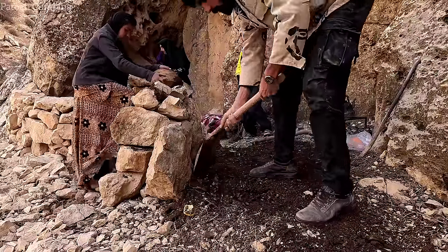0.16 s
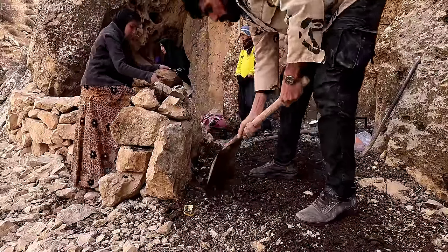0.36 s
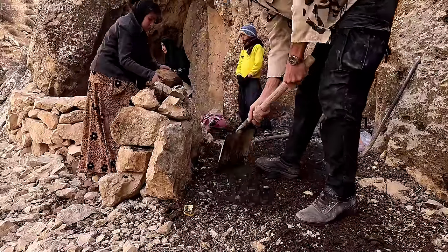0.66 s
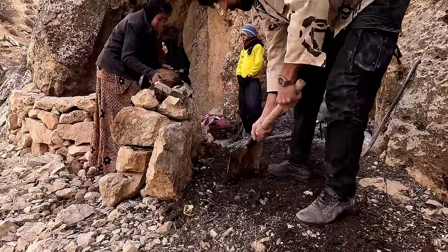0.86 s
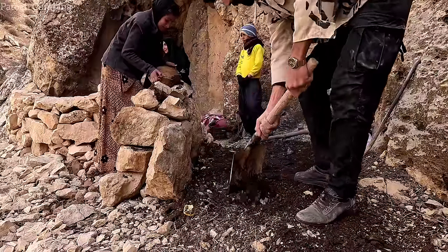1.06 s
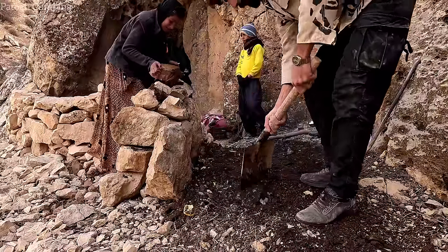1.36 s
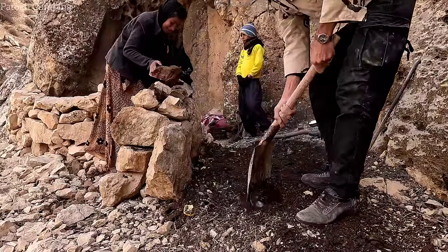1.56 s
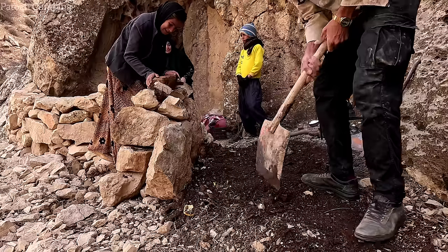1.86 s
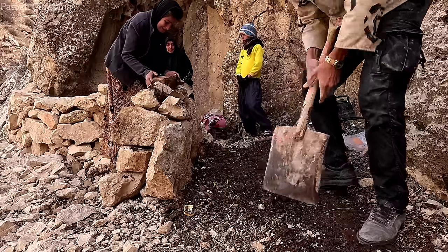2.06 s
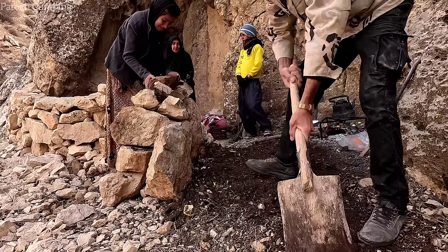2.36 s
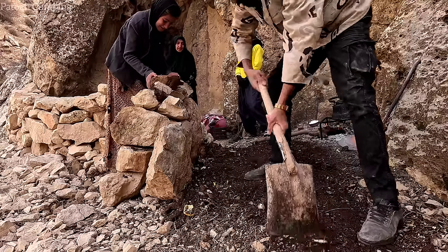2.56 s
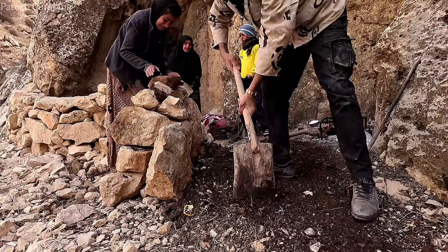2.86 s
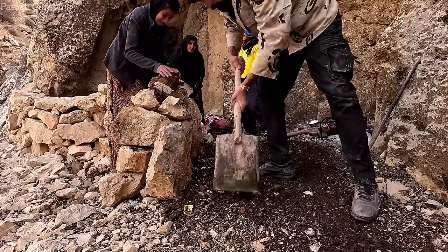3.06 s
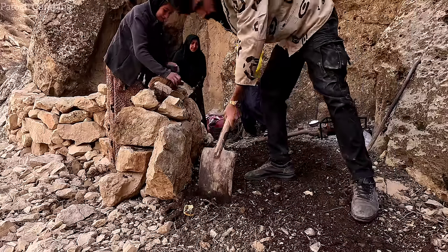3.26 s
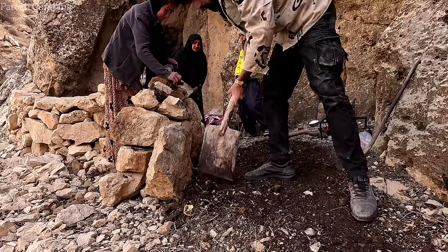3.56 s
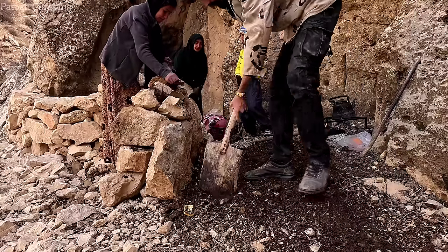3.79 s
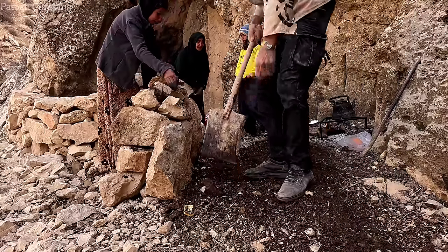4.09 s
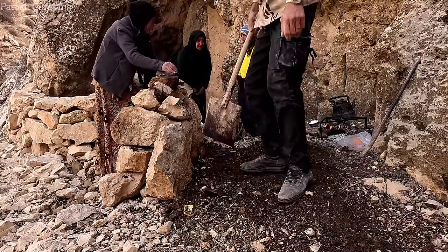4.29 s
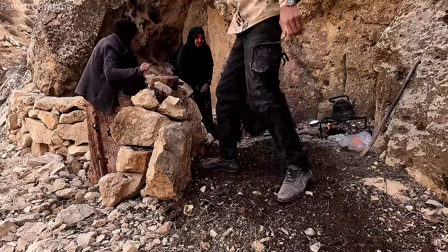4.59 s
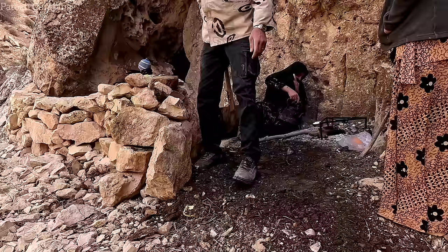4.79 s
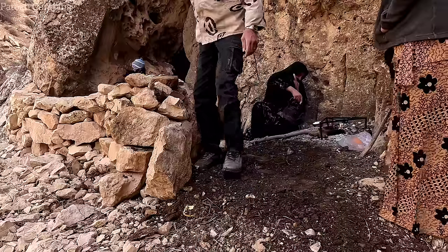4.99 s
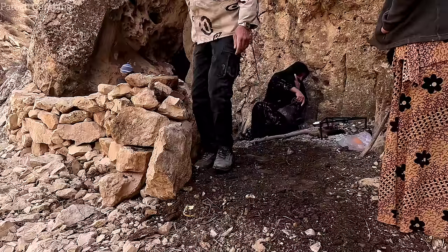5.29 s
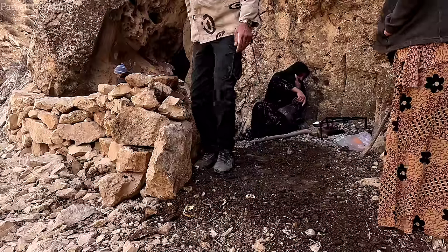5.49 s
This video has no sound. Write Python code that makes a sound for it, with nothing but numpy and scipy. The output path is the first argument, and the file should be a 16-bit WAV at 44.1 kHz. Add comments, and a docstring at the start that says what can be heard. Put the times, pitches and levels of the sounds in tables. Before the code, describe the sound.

Shovel blows, grinding grit and knocking stones sound a few steps from a phone's stereo microphone, over quiet air hiss and soft low wind buffets. Three busy crunching clusters are followed by sparser single hits, with a small sharp tick to the left near three seconds. The blade rings briefly, muffled by dirt, and rock gives a short rough echo. Finally the digging stops, leaving faint scrapes and foot-like knocks.

```python
"""Quiet outdoor hiss (shaped noise) and wind puffs (low noise) run throughout, a few steps from the digging.
From the start dirt slides on a steel shovel and under feet, and blows chop stony dirt: bursts of noise grains.
Stones knock (short tones) and the blade rings (fading modes); a rock overhang adds scattered noise echoes.
A sharp tick sounds on the left at 3.08 s. From about 4 s the blows thin out, and near 4.77 s comes
a blink of silence before the last soft scrapes and knocks."""
import sys
import numpy as np
from scipy import signal
from scipy.fft import rfft, irfft
from scipy.io import wavfile
from scipy.ndimage import uniform_filter1d

SR = 44100
rng = np.random.default_rng(int(sys.argv[2]) if len(sys.argv) > 2 else 0)


def waveform_to_disk(signal):
    """Save audio, clipped to [-1, 1], as 16-bit WAV at the path in sys.argv[1]."""
    frames = np.transpose(np.atleast_2d(signal))
    scaled = np.clip(frames, -1, 1) * 32767
    samples = np.round(scaled).astype(np.int16)
    wavfile.write(sys.argv[1], SR, samples)


N = 248724
T = np.arange(N) / SR  # time of every sample, s

# The outdoor hiss. Each row: frequency in Hz, relative level in dB (per Hz).
AIR_SPECTRUM = [(59, -25.5), (100, -25.5), (185, 8), (295, -1), (558, -5), (860, -23), (1030, -1),
                (1310, -1.5), (3050, -12), (6990, -9.5), (9210, -18.5), (10200, -26.5), (16000, -57)]
AIR_DB = -63

# Low wind puffs on the microphone. Each row: peak time in seconds, level in dB.
WIND_PUFFS = [(.07, -57), (.42, -54), (0.914, -40.5), (1.09, -43.5), (1.45, -52), (1.84, -40.5),
              (1.97, -44.5), (2.581, -45), (2.72, -42), (2.82, -43.5), (3.09, -51), (3.29, -51),
              (3.75, -51.5), (4.48, -57.5), (4.8, -55.5), (4.98, -56), (5.199, -50), (5.471, -57)]
PUFF_RISE_DB_S, PUFF_FALL_DB_S = 397.5, 135.5  # dB per second before and after the peak
BREEZE_DB = -70.5  # level between puffs

# Dirt sliding on the blade and under feet. Each row: fullest moment in seconds, swell in seconds,
# fade in seconds, level in dB, brightness in dB per band step, thud against the level in dB.
DIRT_SLIDES = [(.08, 0.56, 0.19, -56, 5.5, 2.5), (.35, .08, 0.11, -50.5, -5, 3.5),
               (.45, 0.12, 0.18, -42, 3.5, -5), (.7, 0.077, 0.12, -55.5, -1, -4),
               (1.07, 0.12, 0.14, -47, -8, -2), (1.3, 0.2, 0.063, -69, -13, 17.5),
               (1.66, 0.17, 0.45, -61, 7, -7.5), (1.85, 0.12, 0.45, -61, -10.5, 10.5),
               (2.2, 0.68, 0.48, -55.5, 1, -10), (2.7, 0.18, 0.18, -30.5, -2.5, -6),
               (2.95, 0.087, 0.1, -58, 8, -7.5), (3.361, .06, 0.2, -48.5, -2, -13),
               (3.9, 0.18, 0.09, -45, 2.5, -4), (4.15, 0.14, 0.12, -66, 12.5, -7),
               (4.4, 0.28, 0.17, -56, -0.5, -3.5), (4.605, 0.15, 0.093, -45.5, -4, 2),
               (4.89, 0.22, 0.1, -56.5, -1, 9.5), (5.3, 0.3, 0.31, -59.5, 4, 6.5)]
SLIDE_EDGE_DB = -18  # level at the ends of swell and fade, against the fullest moment

# The four bands of grit: body, thud, clink, grit. Each row: lowest and highest frequency in Hz.
GRIT_BANDS = [(920, 2000), (120, 720), (2000, 4500), (4500, 15000)]
# How long a crunch lasts in each of those bands, as a factor on the blow's own crunch time.
BAND_LENGTHS = [0.78, 1.09, 0.73, 0.6]
FLANK_DB = -5.5  # body and grit lie this far under the clink band, before brightness tips them
PEBBLES_PER_S, PEBBLE_DB, PEBBLE_T60_S = 50, -4, .014  # rate at each pitch, level against the grit, ring time

# Blows of blade, stones and feet. Each row: start in seconds, clink level in dB, brightness in dB per
# band step, thud against the clink in dB, pitch of the loudest stone in Hz, rise in seconds,
# basic crunch time (to -60 dB) in seconds.
BLOW_LIST = [(0.131, -48.5, -1.5, -0.5, 1650, 0.0013, 0.35), (0.219, -18.5, -0.5, -9, 1810, 0.0043, 0.15),
             (0.235, -34.5, 6.5, -7.5, 2960, 0.00056, 0.25), (0.317, -33.5, 11, -24, 3880, 0.0027, 0.072),
             (0.325, -21.5, 5.5, -17, 6930, 0.0035, 0.085), (0.394, -17, 8.5, -11.5, 2786, 0.00087, 0.059),
             (0.408, -27, -1, -5, 2620, 0.00063, 0.13), (0.419, -19, 4.5, -18, 1790, 0.002, 0.13),
             (0.436, -27.5, -8, -4, 1090, 0.002, 0.058), (0.467, -34.5, 4.5, -10.5, 2800, 0.0011, 0.27),
             (0.506, -37.5, 4, -4.5, 2850, 0.0057, 0.16), (0.559, -25, 0.5, -17, 2250, 0.0043, 0.066),
             (0.639, -45, 14.5, -30, 3150, 0.0014, 0.074), (0.677, -47.5, 15, 1, 7310, 0.00099, 0.079),
             (0.901, -13.5, 9.5, -22.5, 6100, 0.0017, 0.048), (0.956, -22, 4.5, -14.5, 5040, 0.0034, 0.11),
             (0.97, -14.5, 2.5, -21, 2380, 0.0038, 0.066), (1.002, -27.5, 9.5, -7.5, 6650, 0.0047, 0.085),
             (1.034, -26, 9, -3.5, 3400, 0.0046, 0.09), (1.092, -40, 8.5, -15, 1950, 0.0005, 0.13),
             (1.119, -37.5, 11.5, 0, 6900, 0.0036, 0.086), (1.155, -40, -4, -0.5, 1060, 0.00079, 0.12),
             (1.178, -42, -10, -9, 1624, 0.0014, 0.062), (1.426, -22.5, 4, -26, 1850, 0.0013, 0.052),
             (1.436, -17.5, 4.5, -8, 3800, 0.00089, 0.065),
             (1.473, -12.5, 2.5, -26.5, 5430, 0.00015, 0.027),
             (1.484, -16.5, 1.5, -21, 3140, 0.00054, 0.066), (1.51, -16.5, 3, -13, 2130, 0.0014, 0.079),
             (1.556, -24.5, 4.5, -13, 3780, 0.0023, 0.1), (1.601, -31, 8.5, -34, 3580, 0.00077, 0.086),
             (1.614, -29, 0.5, -37, 2730, 0.00078, 0.053), (1.761, -46, -20.5, 15.5, 1900, 0.0027, 0.11),
             (1.796, -41.5, 10.5, 13, 890, 0.0015, 0.082), (1.814, -52.5, -15, 12, 900, 0.0044, .2),
             (1.916, -50, 2, 13.5, 1580, 0.0011, 0.063), (2.383, -25, 6.5, -18, 2940, 0.0029, 0.12),
             (2.425, -32.5, 0, -12.5, 1900, 0.0025, 0.13), (2.457, -35.5, 3, -13, 1774, 0.0022, 0.046),
             (2.518, -32.5, 6, -23.5, 4740, 0.0047, 0.15), (2.536, -33.5, 1.5, 0, 4260, 0.0012, 0.66),
             (2.565, -33, -3, -4, 2800, 0.00077, 0.1), (2.584, -20.5, 4, -22, 1770, 0.0075, 0.074),
             (2.593, -17.5, -1.5, -24, 1473, 0.005, 0.092), (2.618, -23, 1, -13, 2710, 0.0026, 0.09),
             (2.648, -18, 4.5, -13, 1470, 0.0025, 0.13), (2.674, -18, 3.5, -4, 3180, 0.0012, 0.064),
             (2.691, -17, 0, -18, 2250, 0.0055, 0.064), (2.712, -26.5, 6, -8, 2460, 0.0005, 0.13),
             (2.722, -29.5, 10.5, -1, 7100, 0.0022, 0.09), (2.74, -24.5, -0.5, -6, 2220, 0.001, 0.19),
             (2.772, -29, 4.5, -7, 2160, 0.0075, 0.27), (2.8, -20, -4.5, -12.5, 1360, 0.0027, 0.074),
             (2.82, -26.5, 5.5, -19, 1376, 0.0043, 0.084), (2.883, -40, 12, 0.5, 1360, 0.0044, 0.034),
             (2.984, -47.5, 8.5, -15.5, 6450, 0.00098, 0.067),
             (3.264, -23.5, 3.5, -11.5, 3520, 0.0023, 0.11), (3.278, -19.5, 12.5, -14, 6500, 0.001, 0.11),
             (3.293, -20.5, -6.5, -0.5, 3180, 0.00038, 0.032), (3.331, -36.5, 6.5, -8.5, 1830, 0.0017, 0.3),
             (3.384, -39.5, 13.5, -7, 7240, 0.003, 0.038), (3.423, -47, 5, -6.5, 1127, 0.0014, 0.13),
             (3.466, -39, 4.5, -17.5, 1815, 0.003, 0.065), (3.725, -37, 4, -8, 2800, 0.001, 0.31),
             (3.742, -17, 1, -8, 2340, 0.0015, 0.059), (3.796, -33.5, -13, -6, 1280, 0.0042, 0.11),
             (3.845, -40, 10, -10, 1740, 0.0031, 0.22), (3.892, -28, -6, -7.5, 1290, 0.0011, 0.073),
             (3.967, -42.5, -7.5, -8.5, 1720, 0.00086, 0.15), (4.37, -38.5, 4, -17, 2440, 0.00081, 0.02),
             (4.544, -41, 12.5, -5, 3450, 0.00063, 0.072), (4.585, -42.5, -7, -0.5, 1010, 0.002, 0.14),
             (4.615, -28.5, 10, -6.5, 6030, 0.00073, 0.037), (4.784, -53, -6, 8, 966, 0.0011, 0.081),
             (4.921, -53, -12.5, 6, 1380, 0.0023, 0.13), (5.149, -42.5, -4.5, 2, 1300, 0.0032, 0.16),
             (5.274, -32, -16, 1.5, 1870, 0.00069, 0.077), (5.283, -36.5, 3.5, -16, 1290, 0.0013, 0.071),
             (5.433, -55, -17, 11.5, 990, 0.0019, 0.14), (5.448, -47, 11, -6, 2660, 0.0016, 0.063)]
BLOW_LUMPS_DB = 2.0  # unevenness of the grains
CRACK_DB, CRACK_T60_S = -4.5, 0.0043  # extra first contact: level against the crunch, fade time
CRUNCH_BEND = 1.116  # above 1 the crunch holds a moment, then stops short
STONE_DB = 4.5  # the loudest stone in a blow, against the clink
STONE_WIDTH, STONE_T60 = 0.041, 0.41  # its width as a share of pitch, its extra fade against the crunch time

# Ringing tones of the free steel blade. Each row: frequency in Hz, relative level in dB,
# ring time in seconds before dirt shortens it.
BLADE_MODES = [(641, -10, .2), (845, -12, .35), (1023, -8, .2), (1260, -3, .14), (1365, -3, .28),
               (1464, -1, .5), (1566, -8, .24), (1755, -9, .36), (1846, -6, .24), (2013, -7, .16),
               (2264, -1, .24), (2417, -8, .2), (2635, -8, .2), (2920, -10, .17), (3063, -7, .12),
               (3130, -10, .2), (3451, -12, .23), (3760, -13, .26), (4258, -15, .17), (4414, -7, .27),
               (4720, -12, .16), (5560, -14, .15), (6449, -17, .2), (7181, -13, .14)]
BURIED_T60, BURIED_DB = 0.08, -46.5  # dirt on the blade: share of ring time left, level
WANDER_DB = 9.5  # drift of each ringing tone
LAID_DOWN_S = 4.2  # after this the blade is out of the dirt and the grit no longer rings it

# Single stones, from pebble ticks to dull thuds. Each row: start in seconds, level in dB,
# pitch in Hz, fade time in seconds.
STONE_KNOCKS = [(0.158, -12.5, 1630, 0.0037), (.343, -18.5, 393, 0.023), (.38, -20, 397, 0.022),
                (.624, -31, 7360, 0.0051), (0.646, -28, 4830, 0.0065), (0.2284, -6.5, 2710, 0.028),
                (.232, -10.5, 1140, 0.02), (.235, -20, 175, 0.085), (.682, -30, 170, 0.075),
                (.9012, 1, 5700, 0.0039), (.91, -27, 115, .12), (0.725, -25, 7800, 0.0017),
                (.734, -15, 3430, 0.0021), (1.038, -13, 404, 0.022), (1.211, -15, 7700, 0.0011),
                (1.241, -14.5, 4320, 0.0022), (1.284, -27, 880, 0.011), (1.7608, 2.5, 1390, 0.0091),
                (1.8065, 0, 1340, 0.0095), (1.8105, -1, 1024, 0.0081), (1.992, -28, 1165, 0.014),
                (2.597, -5, 2990, 0.017), (2.621, -9.5, 2690, .015), (2.65, -8, 3200, .015),
                (2.6765, -6.5, 3120, .018), (2.677, -10.5, 2180, .02), (2.682, -12, 1695, 0.038),
                (2.694, -6.5, 3300, .008), (2.7, -14.5, 1200, .04), (2.741, -14, 2250, 0.038),
                (3.121, -26, 6100, 0.0027), (3.222, -28, 6950, 0.0023), (3.288, -2, 409, 0.052),
                (3.289, -7.5, 1137, 0.03), (3.37, -25, 1230, 0.028), (3.285, -12.5, 137, 0.066),
                (3.744, -16.5, 178, 0.04), (3.745, -8.5, 606, 0.012), (3.802, -17, 663, 0.04),
                (3.882, -18, 498, 0.055), (3.891, -8.5, 1030, 0.026), (4.043, 5, 2530, 0.00091),
                (4.093, -34, 1340, 0.0089), (4.513, -18.5, 5940, 0.002), (4.531, -18.5, 1190, 0.0077),
                (4.595, -28, 476, .03), (4.61, -20.5, 940, 0.018), (4.650, -21, 6030, 0.0022),
                (5.128, -28.5, 1430, 0.0066), (5.211, -27, 4600, 0.0023), (5.276, -20.5, 436, 0.036),
                (5.282, -21, 1080, 0.033), (5.305, -27, 2000, .02), (5.583, -31.5, 608, 0.01)]

# Stones that set the blade ringing. Each row: start in seconds, level in dB, centre of the ring in Hz,
# spread in octaves, share of the free ring time, tone in Hz weakened by a hit on its still point.
BLADE_CLINKS = [(0.222, -25, 2400, 0.93, 0.52, 2264), (.396, -27, 2700, 0.54, 0.41, 2264),
                (.562, -34, 2300, .6, 0.28, 2417), (.902, -27.5, 3000, 0.78, .35, 2264),
                (1.473, -26, 2800, 0.54, .4, 2264), (1.603, -33, 3200, 0.61, .4, 2264),
                (1.798, -22.5, 5460, .12, 0.65, 4720), (2.385, -29, 3800, 1.05, 0.53, 2264),
                (2.427, -34, 2200, 0.39, .5, 2264), (2.598, -23, 1800, .8, .35, 2264),
                (2.676, -21, 1900, .6, .3, 1464), (2.695, -22, 1700, 0.58, 0.4, 1464),
                (2.74, -27, 2300, .4, .3, 2013), (2.805, -23, 1500, .5, .35, 2264),
                (3.47, -37, 1940, 0.23, 0.32, 2264), (3.744, -27, 2300, 0.54, .35, 2417),
                (3.803, -26.5, 1900, .7, 0.6, 1365), (3.848, -30.5, 2190, 0.64, 0.76, 1464),
                (3.892, -25, 1400, 1.1, 0.56, 1755), (5.274, -32, 1290, 0.92, .9, 2264),
                (5.285, -30.5, 3120, 0.54, 0.88, 2264)]
CLINK_RISE_S, NODE_DB = .003, -13.5  # rise time, change in the weakened tone

ROCK_T60_S, ROCK_DB = 0.19, -8.5  # echo fade time, echo level before the low cut
ROCK_LOW_HZ = 410  # below this the open air swallows the echoes
CLINK_ECHO = .25  # share of the clinks that reaches the rock

# A sharp tick right by the left microphone port. The row: start in seconds, level in dB,
# left minus right in dB.
LEFT_TICK = (3.084, -22, 6.7)
# Ring of that tick. Each row: frequency in Hz, relative level in dB, ring time in seconds before damping.
TICK_MODES = [(7300, 10.5, 0.017), (7360, -28, 0.19), (3900, -3.5, 0.0084), (5130, 5, 0.0013),
              (730, -12.5, 0.024), (263, -21, 0.1), (12560, -20, 0.029)]

# Tone of the phone's microphones for the digging. Each row: frequency in Hz, level in dB.
PHONE_TONE = [(100, -6), (800, -7), (1500, -5), (3200, -5), (5000, -7.5), (7200, -1.5), (8500, -7.5),
              (10500, -17), (13000, -33.5), (16000, -35)]
# How the digging leans left. Each row: frequency in Hz, left minus right in dB, left lead in radians.
LEFT_LEAN = [(200, -.6, 0), (1200, -1.7, -.25), (3200, -1.2, -.62), (6800, .5, -.4), (10400, 2.5, 0.5),
             (11900, 1, -1.6), (13500, 3, 2)]
# The blink of silence. The row: start in seconds, end in seconds, fade in seconds.
SILENCE = (4.762, 4.773, 0.0012)
TOP_HZ = 16000  # highest frequency kept


def undb(db):
    """Turn dB into a plain gain."""
    return 10 ** (np.asarray(db) / 20)


def unit(x):
    """Scale to an average (rms) strength of 1."""
    return x / np.sqrt(np.mean(x ** 2, axis=-1, keepdims=True))


def band(x, lo_hz, hi_hz):
    """Steep band-pass that keeps white noise of rms 1 near rms 1."""
    sos = signal.butter(3, [lo_hz, hi_hz], "bandpass", fs=SR, output="sos")
    return signal.sosfilt(sos, x) * np.sqrt(SR / 2 / (hi_hz - lo_hz))


def on_axis(table, column):
    """Spread a table column over the spectrum, in straight lines on log frequency."""
    table = np.array(table)
    bins_hz = np.arange(N // 2 + 1) * SR / N
    return np.interp(np.log(bins_hz + 1), np.log(table[:, 0] + 1), table[:, column])


def walk(rate):
    """Random levels gliding to a new value every 1 / rate seconds; spread a little under 1."""
    hold = int(SR / rate)
    steps = np.repeat(rng.standard_normal(N // hold + 1), hold)
    return uniform_filter1d(steps, hold)[:N]


def resonance(hz, t60):
    """Filter numbers for one tone that rings and falls by 60 dB in t60 seconds."""
    r = 1000 ** (-1 / (t60 * SR))
    return [1, -2 * r * np.cos(2 * np.pi * hz / SR), r * r]


def ring(x, modes, damp, wander_db):
    """Feed x into fading tones of alternating sign; damp shortens them, and each feed drifts in level."""
    out = 0
    for k, (hz, db, t60) in enumerate(modes):
        fed = x * undb(db + wander_db * walk(40))
        tone = signal.lfilter([1], resonance(hz, t60 * damp), fed)
        out = out + (-1) ** k * np.sin(2 * np.pi * hz / SR) * tone
    return out


def swells(at_s, db, rise_db_s, fall_db_s):
    """Gain of overlapping swells that rise and fall in straight dB lines; their powers add."""
    coarse = T[::64]
    late = coarse - np.asarray(at_s)[:, None]
    rise, fall = np.reshape(rise_db_s, (-1, 1)), np.reshape(fall_db_s, (-1, 1))
    level_db = np.asarray(db)[:, None] + np.where(late < 0, rise, -fall) * late
    return np.interp(T, coarse, np.sqrt(np.sum(undb(2 * level_db), axis=0)))


def colour(db, bright_db, thud_db):
    """Levels of body, thud, clink and grit: brightness tips body against grit."""
    return db + FLANK_DB - bright_db, db + thud_db, db, db + FLANK_DB + bright_db


def grit(lumpy_db, spiky_db):
    """Dense stone grains: noise in lumps of a few milliseconds, with some larger grains up to a limit."""
    lumps = lumpy_db * np.clip(walk(300), -2, 2)
    size = spiky_db * np.minimum(rng.exponential(size=N), 6)
    return unit(rng.standard_normal(N) * undb(lumps + size))


def air():
    """The quiet outdoor hiss: shaped noise, swelling a little, mostly shared by left and right."""
    noise = rfft(rng.standard_normal((2, N)))
    mid, side = irfft(noise * undb(on_axis(AIR_SPECTRUM, 1)), N)
    return undb(AIR_DB + 2.4 * walk(3.0)) * unit(mid + 0.25 * side * np.array([[1], [-1]]))


def wind():
    """Low buffeting in puffs that come fast and die slower, nearly the same on both ports."""
    s, db = np.transpose(WIND_PUFFS)
    gust = swells(s, db, PUFF_RISE_DB_S, PUFF_FALL_DB_S) + undb(BREEZE_DB)
    rumble = signal.butter(1, [22, 55], "bandpass", fs=SR, output="sos")
    low = signal.butter(3, 75, fs=SR, output="sos")
    mid, side = signal.sosfilt(low, signal.sosfilt(rumble, rng.standard_normal((2, N))))
    return gust * undb(2 * walk(14)) * unit(mid + 0.17 * side * np.array([[1], [-1]]))


def sliding_dirt():
    """Dirt rubs over blade and ground: stuttering grains, one line per band."""
    s, swell_s, fade_s, *levels = np.transpose(DIRT_SLIDES)
    grains, stutter = grit(1.3, 3.67), walk(60)
    lines = []
    for db in colour(*levels):
        drag = swells(s, db, -SLIDE_EDGE_DB / swell_s, -SLIDE_EDGE_DB / fade_s)
        lines.append(drag * undb(stutter + 1.5 * walk(46)) * grains)
    return lines


def pebbles(crunch, lo_hz, hi_hz):
    """Pebbles of seven pitches click at random and ring briefly, harder where the grit is loud."""
    force, out = np.sqrt(np.abs(uniform_filter1d(crunch ** 2, size=128))), 0
    for hz in np.geomspace(lo_hz * 1.08, min(hi_hz, 9000) * .92, 7):
        hits = (rng.random(N) < PEBBLES_PER_S / SR) * rng.uniform(-0.87, 1, N)
        # the evenly hit ring only sets the scale
        even, forced = signal.lfilter([1, -1], resonance(hz, PEBBLE_T60_S), [hits, hits * force])
        out = out + forced / np.std(even)
    return undb(PEBBLE_DB) * out / np.sqrt(7)


def blows():
    """Each blow bursts into grains that fade; one line per band, plus a line for its loudest stone."""
    crunch, t = np.zeros((5, N + SR)), T[:SR // 6]
    grains, crack = grit(BLOW_LUMPS_DB, 1.53), undb(CRACK_DB) * 1000 ** (-t / CRACK_T60_S)
    for s, clink_db, bright_db, thud_db, stone_hz, rise_s, t60 in BLOW_LIST:
        i = int(s * SR)
        burst = grains[i:i + len(t)]
        for k, db in enumerate(colour(clink_db, bright_db, thud_db)):
            fade = 1000 ** -(t / (t60 * BAND_LENGTHS[k])) ** CRUNCH_BEND
            shape = np.minimum(t / rise_s, 1) * (fade + crack)
            # a blow spends the energy it has
            even = np.sqrt(np.sum(shape ** 2) / np.sum((shape * burst) ** 2))
            crunch[k, i:i + len(t)] += undb(db) * even * shape * burst
        # the stone starts from the shape of the last band and fades faster
        shape = shape * 1000 ** (-t / (t60 * STONE_T60))
        stone = signal.lfilter(*signal.iirpeak(stone_hz, 1 / STONE_WIDTH, fs=SR), shape * burst)
        even = np.sqrt(np.sum(shape ** 2) / np.sum(stone ** 2))
        crunch[4, i:i + len(t)] += undb(clink_db + STONE_DB) * stone * even
    return crunch[:, :N]


def shovel():
    """Blows and sliding dirt sound directly and through the blade, which the dirt damps."""
    crunch, slides = blows(), sliding_dirt()
    out = crunch[4]
    for blow, slide, (lo_hz, hi_hz) in zip(crunch, slides, GRIT_BANDS):
        grains = band(blow + slide, lo_hz, hi_hz)
        out = out + grains + pebbles(grains, lo_hz, hi_hz)
    buried = ring(out * (T < LAID_DOWN_S), BLADE_MODES, BURIED_T60, WANDER_DB)
    return out + undb(BURIED_DB) * buried


def stones():
    """Each knock is a short damped tone with a quicker overtone, rising over about 1.7 cycles."""
    out, t = np.zeros(N + SR), T[:SR // 5]
    for s, db, hz, t60 in STONE_KNOCKS:
        i = int(s * SR)
        fade = 1000 ** (-t / t60)
        overtone = 0.1 * np.sin(2 * np.pi * min(2.1 * hz, 12000) * t) * fade
        tone = np.sin(2 * np.pi * hz * t) + overtone
        rise = np.sin(np.pi / 2 * np.minimum(0.59 * hz * t, 1)) ** 2
        out[i:i + len(t)] += undb(db) * tone * rise * fade
    return out[:N]


def clinks():
    """The blade rings; where it is hit picks the tones around a centre, and dirt on it shortens them."""
    out, t = np.zeros(N + SR), T[:SR // 2]
    hz, mode_db, t60 = np.transpose(BLADE_MODES)[:, :, None]
    spot = rng.standard_normal((len(BLADE_CLINKS), len(BLADE_MODES), 1))
    for (s, db, centre_hz, spread, free, node_hz), chance in zip(BLADE_CLINKS, spot):
        i = int(s * SR)
        still = hz == hz[np.argmin(np.abs(hz - node_hz))]
        reach = np.exp(-.5 * (np.log2(hz / centre_hz) / spread) ** 2) * np.where(still, undb(NODE_DB), 1)
        size = np.sign(chance) * undb(db + mode_db + np.abs(chance)) * reach
        modes = size * np.sin(2 * np.pi * hz * t + 10 * chance) * 1000 ** (-t / (t60 * free))
        out[i:i + len(t)] += modes.sum(axis=0) * np.minimum(t / CLINK_RISE_S, 1)
    return out[:N]


def overhang(x):
    """Short scattered echoes from rock and ground, different at each port: fading noise as an echo."""
    t = T[:SR // 3]
    tail = rng.standard_normal((2, len(t))) * 1000 ** (-t / ROCK_T60_S) * (t > .002)
    tail = tail + 0.38 * tail[::-1]  # partly shared
    tail = undb(ROCK_DB) * tail / np.sqrt(np.sum(tail ** 2, axis=1, keepdims=True))
    tail = signal.lfilter(*signal.butter(1, ROCK_LOW_HZ, "highpass", fs=SR), tail)
    return signal.fftconvolve(x[None], tail, axes=1)[:, :N]


def tick():
    """One hard, tiny contact with a bright ring, louder on the left."""
    s, db, pan_db = LEFT_TICK
    hit = np.zeros(N)
    hit[int(s * SR)] = undb(db)
    return ring(hit, TICK_MODES, 0.8, 0) * undb([[pan_db / 2], [-pan_db / 2]])


def scene():
    """Digging and its echoes pass through the microphone tone; tick, wind and hiss are added."""
    dig, blade = shovel() + stones(), clinks()
    near = dig + blade + overhang(dig + CLINK_ECHO * blade)
    # the two ports hear the digging with slightly different level and phase
    half = undb(on_axis(LEFT_LEAN, 1) / 2) * np.exp(.5j * on_axis(LEFT_LEAN, 2))
    ports = rfft(near) * np.array([half, 1 / half]) * undb(on_axis(PHONE_TONE, 1))
    return irfft(ports, N) + tick() + wind() + air()


def record(dry):
    """Everything fades to the blink of silence and back; the highest treble is filtered off."""
    start, end, fade = SILENCE
    level = np.clip(np.maximum(start - T, T - end) / fade, 0, 1)
    low_pass = signal.ellip(10, .2, 70, TOP_HZ, fs=SR, output="sos")
    return signal.sosfilt(low_pass, dry * level)


dry = scene()
out = record(dry)
waveform_to_disk(out)
```